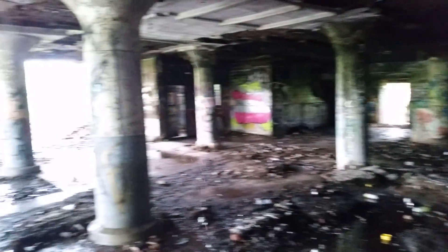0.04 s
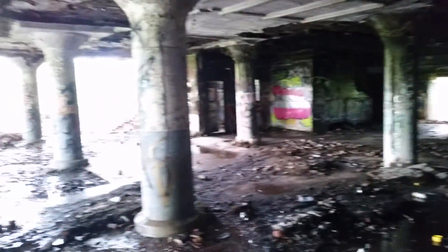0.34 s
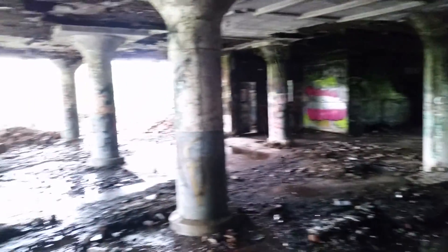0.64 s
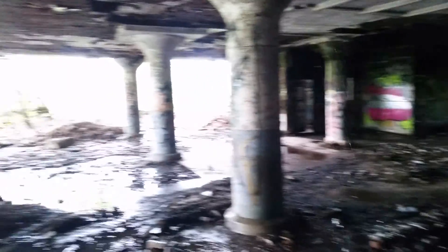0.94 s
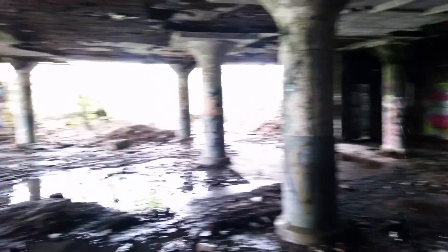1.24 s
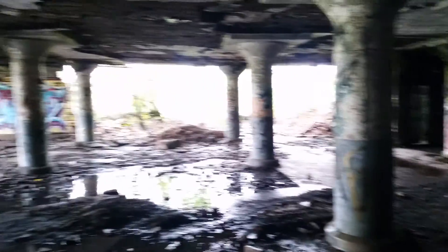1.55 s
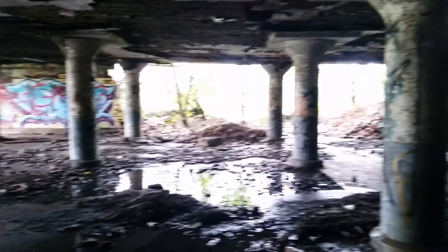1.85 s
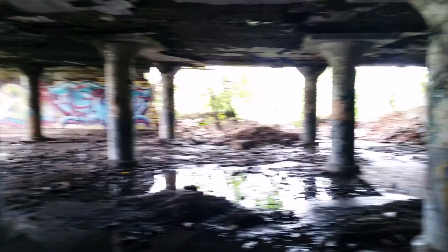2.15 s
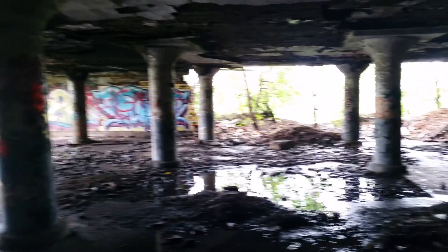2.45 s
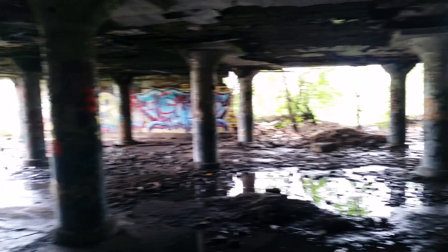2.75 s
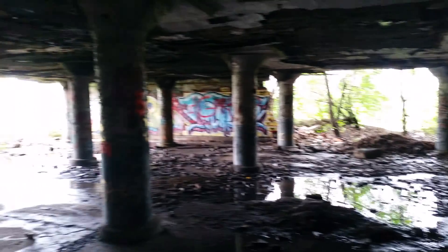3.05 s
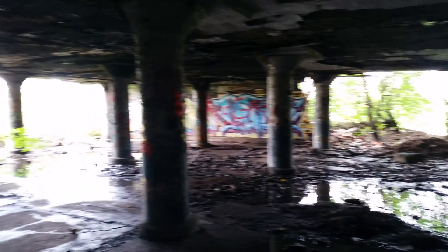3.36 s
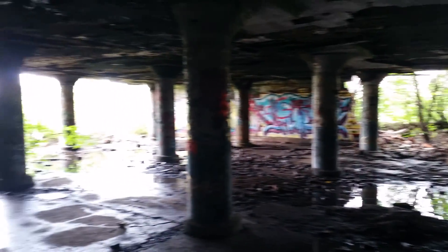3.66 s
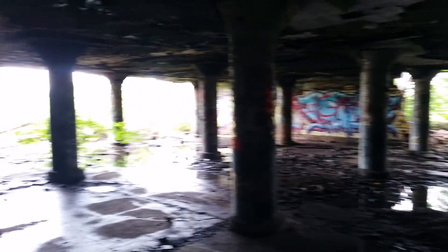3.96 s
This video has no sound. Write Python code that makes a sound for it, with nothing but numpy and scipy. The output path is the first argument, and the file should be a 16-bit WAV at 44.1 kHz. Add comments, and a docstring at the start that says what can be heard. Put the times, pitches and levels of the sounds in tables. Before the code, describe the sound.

Water drips smack and spatter irregularly on wet concrete a few metres from the microphone, echoing in a large, empty hall. Distant drops patter over a low outdoor rumble, and loose debris knocks softly early on and near the end.

```python
"""A large, empty, open-sided hall; a stereo pair stands a few metres from where the ceiling drips.
From the start, drops smack and spatter on wet concrete, some ringing a pocket of trapped air; the low
ceiling and the pillars echo them, then the hall. Far drops patter behind, over a rumble from outdoors.
Loose debris knocks softly at 1.3 s and again just after 3 s. By the end, at 4 s, patter and rumble
have eased a little and the microphones have turned slowly to the left."""
import sys
import numpy as np
from scipy import signal
from scipy.fft import rfft, irfft, next_fast_len
from scipy.io import wavfile
from scipy.ndimage import uniform_filter1d

SR = 44100
rng = np.random.default_rng(int(sys.argv[2]) if len(sys.argv) > 2 else 0)


def generate_wav(sig):
    """Save sig (samples, or channels by samples) to the path in sys.argv[1] as 16-bit PCM at SR."""
    pcm = np.round(np.clip(np.atleast_2d(sig).T, -1, 1) * 32767).astype(np.int16)
    wavfile.write(sys.argv[1], SR, pcm)


N = 176400
DROP_SAMPLES, LEAD_S = 1024, .003  # length of one drop's sound; room ahead of its impact
# Low, middle and high band of a drop: [lower f/Hz, upper f/Hz]
DROP_BANDS = [(900, 3000), (3000, 8500), (8500, 17000)]


def amp(db):
    return 10 ** (np.asarray(db) / 20)


def unit_rms(x):
    return x / np.sqrt(np.mean(x ** 2) + 1e-20)


def along(points, hz):
    """Read [f/Hz, value] points on a log frequency axis."""
    f, v = np.transpose(points)
    return np.interp(np.log(hz + 1), np.log(f + 1), v)


def curve(rows):
    """Read [t/s, value] points at every sample."""
    return np.interp(np.arange(N) / SR, *np.transpose(rows))


def filtered(x, response):
    """Apply a gain given as a function of frequency."""
    m = next_fast_len(N + SR // 4)
    return irfft(rfft(x, m) * response(np.fft.rfftfreq(m, 1 / SR)), m)[..., :N]


def add(track, s, sound):
    """Mix a sound into the track from time s."""
    i = int(round(s * SR))
    a, b = max(i, 0), min(i + sound.shape[-1], N)
    if b > a:
        track[:, a:b] += sound[:, a - i:b - i]


def rush(spectrum, likeness, patchy_db):
    """Stereo noise of rms 1 whose level wavers in patches of time and frequency."""
    z = signal.stft(rng.standard_normal((2, N)), nperseg=256)[2]
    patches = uniform_filter1d(uniform_filter1d(rng.standard_normal(z.shape[1:]), 12, 0), 8, 1)
    pair = signal.istft(z * amp(patchy_db * unit_rms(patches)), nperseg=256)[1][:, :N]

    def mid_side_gains(hz):
        angle = np.arccos(np.clip(along(likeness, hz), -1, 1)) / 2
        return amp(along(spectrum, hz)) * [np.cos(angle), np.sin(angle)]

    mid, side = filtered(pair, mid_side_gains)
    return unit_rms(np.array([mid + side, mid - side]))


def outdoors():
    """Distant rumble comes in through the open sides, with two faint, wavering hums."""
    # Colour of the rumble: [f/Hz, level/dB per Hz]
    spectrum = [(12, -44), (20, -1.5), (49, 1), (91, 3), (140, -5.5), (177, -7.5), (211, -8.5), (286, -11),
                (320, -13), (499, -20), (900, -21.5), (1170, -24), (1980, -120)]
    # Its slow drift: [t/s, level/dB]
    level = [(0, -41), (.6, -39), (1.3, -41.5), (2.3, -41), (2.8, -42.5), (3.2, -43), (4, -43)]
    # How alike it is at the two microphones: [f/Hz, correlation]
    likeness = [(60, 0.77), (130, 0.98), (290, 0.6), (640, 0.42), (1400, 0.046)]
    # Narrow bands of noise that hum: [f/Hz, width/Hz, first level/dB, last level/dB]
    hums = [(171.4, 3.06, -58.5, -52.5), (291.2, 2.3, -54.5, -77.5)]
    out = amp(curve(level)) * rush(spectrum, likeness, patchy_db=1.5)
    for centre, width, first_db, last_db in hums:
        hum = filtered(rng.standard_normal(N), lambda hz: np.exp(-((hz - centre) / width) ** 2 / 2))
        out += unit_rms(hum) * amp(np.linspace(first_db, last_db, N))
    return out


def patter():
    """The farthest drops blur into a wet hiss."""
    # Colour of the hiss: [f/Hz, level/dB per Hz]
    spectrum = [(260, -20), (450, -4.5), (740, 7), (1000, 0), (1500, 5), (2200, 11.5), (3000, 1.5),
                (4500, 7), (6400, 9), (8000, 2.5), (11800, 2.5), (14500, 1.5)]
    # Its slow drift: [t/s, level/dB]
    level = [(0, -42), (.8, -43), (1.6, -45.5), (2.5, -43.5), (3.2, -48), (4, -46)]
    return amp(curve(level)) * rush(spectrum, likeness=[(500, 0.71), (1400, 0.015)], patchy_db=3.5)


def hall(x, stretches=28):
    """The long concrete reverberation, with a new tail for each stretch of time."""
    # Time the hall takes to fall by 60 dB: [f/Hz, t60/s]
    t60 = [(300, 1.9), (2200, 0.91), (6000, 0.32), (10000, 0.38), (15000, 0.19)]
    out = np.zeros((2, N))
    for part in np.array_split(np.arange(N), stretches):
        hz, t, noise = signal.stft(rng.standard_normal((2, SR)), SR, nperseg=256)
        decay = amp(-60 * t / along(t60, hz)[:, None])
        onset = 1 - np.exp(-t / 0.0016)
        tail = signal.istft(noise * decay * onset, SR, nperseg=256)[1]
        add(out, part[0] / SR, signal.fftconvolve(x[:, part], tail / np.linalg.norm(tail[0]), axes=1))
    return out


def travel(times, spectra, direct_left_db=8, echo_spread_db=1.5):
    """Each sound reaches the two microphones at different times and returns from ceiling and pillars."""
    # Echoes off ceiling and pillars: [delay/s, scatter/s, level/dB]
    echoes = [(.00475, 0.00014, -3.5), (.0068, 0.0013, -9.5), (.0093, 0.00088, -14.5),
              (0.012, 0.00018, -15), (0.017, 0.0005, -21.5), (0.029, 0.004, -15.5)]
    # The pair turning left: [t/s, lag of the left microphone/ms]
    turn = [(0, -0.085), (1.2, 0.11), (1.75, 0.22), (2.2, 0.357), (4, 0.448)]
    out, hz = np.zeros((2, N)), np.fft.rfftfreq(DROP_SAMPLES, 1 / SR)
    chance = rng.standard_normal((len(times), len(echoes), 3))  # delay, left level, right level
    lag_s = np.interp(times, *np.transpose(turn)) / 1000
    phase_shift = np.exp(np.pi * 1j * lag_s[:, None, None] * np.outer([-1, 1], hz))
    for s, sound, jitters in zip(times - LEAD_S, irfft(spectra * phase_shift), chance):
        add(out, s, sound * amp([[direct_left_db / 2], [-direct_left_db / 2]]))
        for (delay, scatter, db), jitter in zip(echoes, jitters):
            echo = sound * amp(db + echo_spread_db * jitter[1:, None])
            add(out, s + delay + scatter * jitter[0], echo)
    return out


def bubbles(s, hz, db, life_cycles, rise_per_s=20, swell_cycles=0.79):
    """Damped bubbles ring for a few cycles and glide up by a share of their pitch."""
    t = np.maximum(np.arange(DROP_SAMPLES) / SR - LEAD_S, 0)
    cycles = hz[:, None] * t * (1 + rise_per_s * t / 2)
    swell = 1 - np.exp(-cycles / swell_cycles)
    decay = np.exp(-cycles / life_cycles) * (1 - (t / t[-1]) ** 2)
    rings = amp(db)[:, None] * np.sin(2 * np.pi * cycles) * swell * decay
    return travel(s, rfft(rings)[:, None])


def trickle(count=240, per_s=45, centre_hz=1884, octaves=0.436):
    """Faint, hollow bubbling from distant puddles."""
    s = np.cumsum(rng.exponential(size=count)) / per_s
    pitch, size = np.clip(rng.standard_normal((2, count)), -2, 2)
    return bubbles(s, centre_hz * 2 ** (octaves * pitch), db=-47 + 2.5 * size, life_cycles=12.3)


def droplets(count=360, per_s=70, centre_hz=7400, octaves=0.57):
    """Fine spray lands as tiny, high ticks, each with a pitch of its own."""
    s = np.cumsum(rng.exponential(size=count)) / per_s
    pitch, faintness = np.clip(rng.standard_normal((2, count)), -2, 2)
    return bubbles(s, centre_hz * 2 ** (octaves * pitch), db=-35 - 1.5 * faintness, life_cycles=5.1)


def debris(rise_s=0.0048, width_octaves=0.36):
    """Loose debris gives dull, short knocks with no ring."""
    # Soft knocks: [t/s, centre f/Hz, level/dB]
    knocks = [(1.273, 192.3, -30.5), (3.158, 395, -40.5), (3.160, 734, -41), (3.212, 1250, -43.5),
              (3.342, 1100, -38.5)]
    out, t = np.zeros((2, N)), np.arange(SR // 10) / SR
    hz = np.fft.rfftfreq(len(t), 1 / SR)
    for s, centre, db in knocks:
        band = np.exp(-(np.log2((hz + 1) / centre) / width_octaves) ** 2 / 2)
        knock = irfft(rfft(rng.standard_normal(len(t))) * band) * t * np.exp(-t / rise_s)
        add(out, s, amp(db) * knock[None] / abs(knock).max())
    return out


def drops(times, band_db, smack_s=0.00017, spatter_s=0.002, spatter_db=-9.5):
    """Water hits wet concrete: a sharp smack and a short spatter, with a level in each band."""
    # Colour of an impact: [f/Hz, level/dB]
    colour = [(300, -39), (1000, -16.5), (1600, -9.5), (2300, -2), (3400, -1), (5000, 4.5), (6500, 8),
              (7800, 2), (9500, 1.5), (11500, 6.5), (14500, 4.5)]
    hz, t = np.fft.rfftfreq(DROP_SAMPLES, 1 / SR), np.arange(DROP_SAMPLES) / SR - LEAD_S
    dying = lambda life: (t >= 0) * np.exp(-abs(t) / life)
    noise = rng.standard_normal((len(times), 3, DROP_SAMPLES))  # smack, left and right spatter
    smack = noise[:, :1] * dying(smack_s)
    specks = unit_rms(np.sign(noise[:, 1:]) * noise[:, 1:] ** 2)  # squaring breaks hiss into specks
    spatter = amp(spatter_db) * specks * dying(spatter_s)
    spectra = rfft(smack + spatter) * amp(along(colour, hz))
    power_gain = 0
    for k, (lo, hi) in enumerate(DROP_BANDS):
        band = 1 / np.sqrt((1 + (lo / (hz + 1)) ** (6 + 8 * k)) * (1 + (hz / hi) ** 14))
        energy = np.sum(irfft(spectra * band) ** 2, axis=2).mean(axis=1)
        power = energy / (.004 * SR)  # as if spread over 4 ms
        power_gain = power_gain + (amp(band_db[:, k]) ** 2 / power)[:, None] * band ** 2
    return travel(times, spectra * np.sqrt(power_gain)[:, None])


def far_drips(count=520, per_s=100, colour_spread_db=2.5):
    """Weaker drops land at random times all over the floor."""
    # Balance of a far drop: [low level/dB, middle level/dB, high level/dB]
    balance_db = [-18, -1.5, 4]
    s = np.cumsum(rng.exponential(size=count)) / per_s
    size_db = -49 + np.minimum(rng.exponential(size=(count, 1)), 2)
    colour_db = colour_spread_db * np.clip(rng.standard_normal((count, len(DROP_BANDS))), -2, 2)
    return drops(s, size_db + balance_db + colour_db)


def plinks():
    """A few near drops trap a small pocket of air, which rings briefly."""
    # Ringing air pockets: [t/s, f/Hz, level/dB, fall to 1/e in cycles]
    pockets = [(.0612, 2290, -19, 1.9), (0.0611, 3100, -9.5, 2), (.0616, 6800, -11, 3),
               (.205, 940, -44, 6.6), (.3192, 3650, -17, 2), (.3422, 6140, -8, 2.6),
               (.5189, 4950, -10.5, 2.4), (.5911, 6360, -4.5, 2.3), (.7499, 2160, -15, 2.3),
               (0.7559, 1447, -22, 1.3), (1.069, 3550, -21.5, 2.5), (1.1445, 5960, -14.5, 4.7),
               (1.588, 5050, -15, 2), (1.7812, 2250, -25, 1.6), (1.7813, 6300, -5, 4.6),
               (1.7823, 5060, -13, 2.3), (2.1255, 5560, -18, 4.3), (2.7757, 4900, -22, 2.6),
               (2.866, 7450, -10, 2.9), (2.9548, 5714, -17, 2.7), (3.4406, 4820, -6, 2.3)]
    s, hz, db, life_cycles = np.transpose(pockets)
    return bubbles(s, hz, db, life_cycles[:, None])


def near_drips(gain_db=1):
    """Drops from the ceiling land within a few metres of the microphones."""
    # Impacts, with relative band levels: [t/s, low level/dB, middle level/dB, high level/dB]
    impacts = [(0.0619, -30.5, -26.5, -28.5), (0.1326, -52, -31, -36), (0.1695, -64, -40, -36),
               (0.1861, -72, -29.5, -32.5), (0.2519, -69, -34, -27.5), (0.3198, -39, -34.5, -37),
               (0.3423, -39.5, -34, -32), (0.442, -73, -45, -36), (0.4743, -51, -34.5, -34),
               (0.519, -40.5, -30, -30.5), (0.5912, -57, -28, -22.5), (0.6262, -72, -34, -28.5),
               (0.6621, -64, -39, -35), (0.6717, -60, -35.5, -30), (0.712, -45, -37, -32.5),
               (0.7434, -56, -34, -29.5), (0.75, -32.5, -34, -40), (0.7589, -39, -28.5, -31),
               (0.791, -57, -37, -29.5), (0.97, -62, -42, -34), (1.0477, -44, -34.5, -42),
               (1.0761, -45, -30, -31), (1.1176, -45, -35.5, -30.5), (1.1442, -55, -36.5, -35),
               (1.2204, -46, -30.5, -40), (1.2228, -39, -35, -39), (1.2349, -40, -31.5, -24.5),
               (1.2865, -60, -49, -36), (1.333, -44, -39, -32), (1.3873, -39.5, -41, -34),
               (1.4608, -43, -31, -27), (1.502, -49, -37.5, -36.5), (1.5942, -51, -32, -30),
               (1.626, -67, -70, -42), (1.7194, -81, -45, -30.5), (1.7812, -29.5, -26, -22),
               (1.7876, -37.5, -36.5, -28), (1.8598, -55, -45, -36), (1.8793, -49, -32.5, -28),
               (1.9398, -49, -37, -32), (2.0118, -45, -30, -21), (2.1253, -44, -32.5, -39),
               (2.1897, -54, -40, -38), (2.2108, -43, -39.5, -33), (2.3018, -43, -27, -28),
               (2.3281, -36, -32, -31.5), (2.349, -45.5, -33, -31), (2.374, -51, -36, -48),
               (2.443, -37.5, -33, -35), (2.473, -72, -54, -38), (2.506, -40, -47, -41),
               (2.5405, -47, -41, -46), (2.6274, -37.5, -31.5, -43), (2.698, -53, -36, -32.5),
               (2.7083, -54, -32, -34), (2.7195, -48.5, -32.5, -40), (2.7326, -43, -32.5, -31),
               (2.7755, -48, -31.5, -35), (2.7972, -45.5, -35, -31), (2.8657, -74, -34.5, -25.5),
               (2.9016, -74, -56, -30.5), (2.9164, -70, -34, -45), (2.927, -81, -49, -31),
               (2.955, -45.5, -38, -39), (3.0232, -42, -38.5, -40), (3.04, -43, -34.5, -29.5),
               (3.2053, -73, -59, -33), (3.2585, -69, -42.5, -30.5), (3.3382, -56, -64, -38),
               (3.3824, -60, -35.5, -44), (3.3975, -68, -58, -24.5), (3.4415, -35, -29, -25),
               (3.4936, -57, -39, -30), (3.517, -59, -33.5, -34), (3.541, -45, -30, -23.5),
               (3.7078, -47, -32.5, -32.5), (3.7674, -56, -30, -42), (3.7772, -37, -36, -36),
               (3.7953, -60, -32, -30.5), (3.832, -38, -32, -33), (3.8592, -47, -44, -40),
               (3.9522, -49.5, -36.5, -30.5), (3.9639, -65, -48, -37), (3.9764, -49.5, -33.5, -33)]
    rows = np.array(impacts)
    return amp(gain_db) * drops(rows[:, 0], rows[:, 1:])


def scene():
    """Drips and debris with their reverberation, in front of patter and rumble."""
    hits = near_drips() + far_drips() + droplets() + trickle() + debris()
    rings = plinks()
    reverberation = hall(amp(-6.5) * hits + amp(-10.5) * rings)  # the close rings excite the hall less
    return hits + rings + reverberation + patter() + outdoors()


def record(dry):
    """The two microphone ports colour the sound differently; the treble ends steeply near 14.7 kHz."""
    # Left port over right: [f/Hz, level/dB]
    left_over_right = [(60, 0), (170, 1.5), (1000, 3.5), (2300, 0.5), (3500, 1.5), (4900, -3.5), (6500, 3),
                       (8000, -0.5), (9800, -6.5), (12300, -2), (14500, -6.5)]
    ports = filtered(dry, lambda hz: amp(np.outer([.5, -.5], along(left_over_right, hz))))
    treble_cut = lambda hz: amp(np.interp(hz, [14550, 14950, 15900, 16800], [0, -16, -30, -90]))
    return filtered(ports, treble_cut)


dry = scene()
out = record(dry)
generate_wav(out)
```